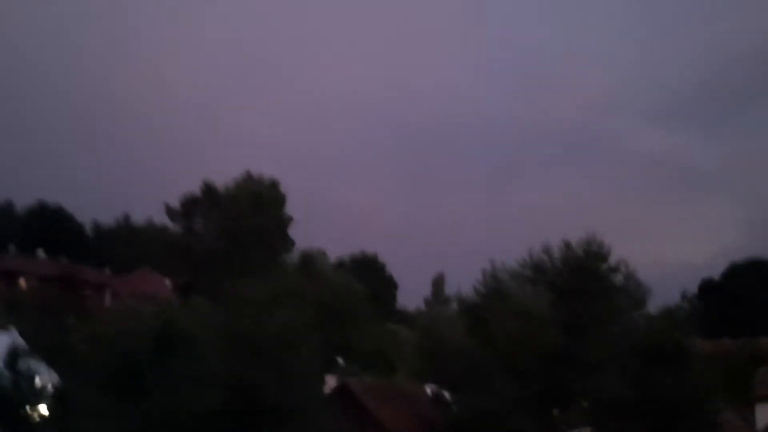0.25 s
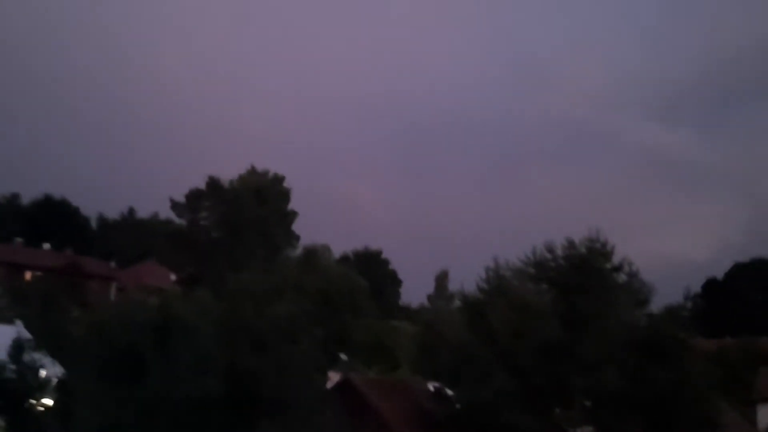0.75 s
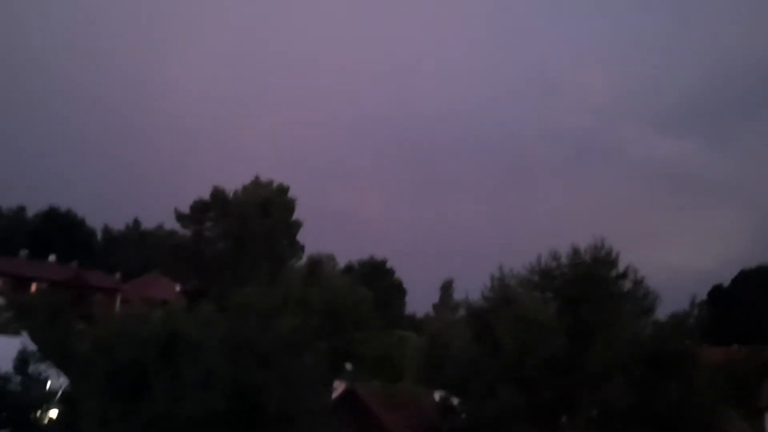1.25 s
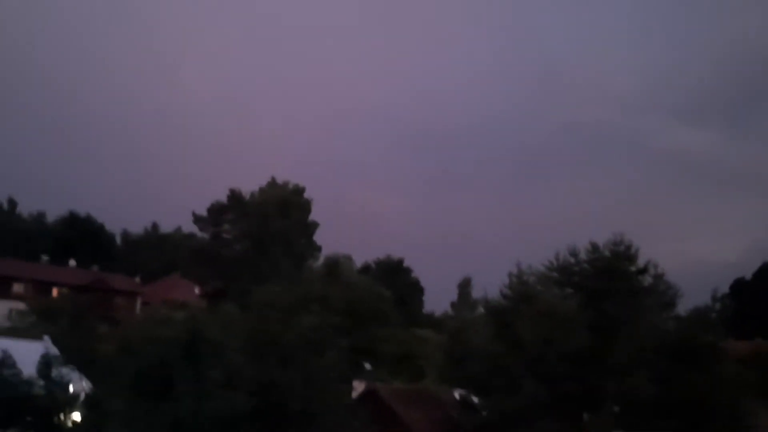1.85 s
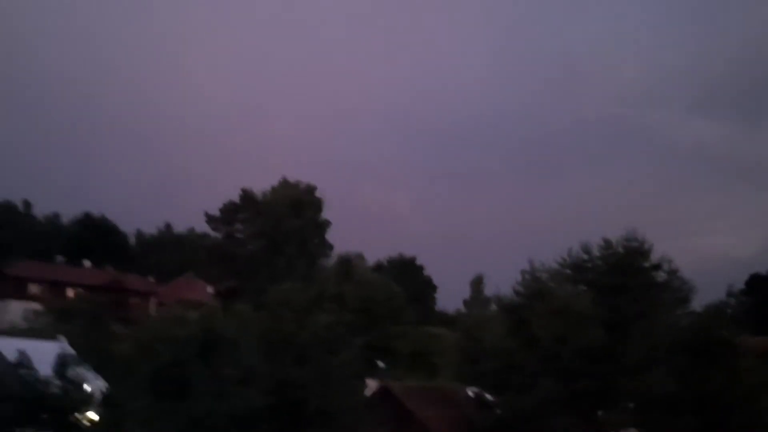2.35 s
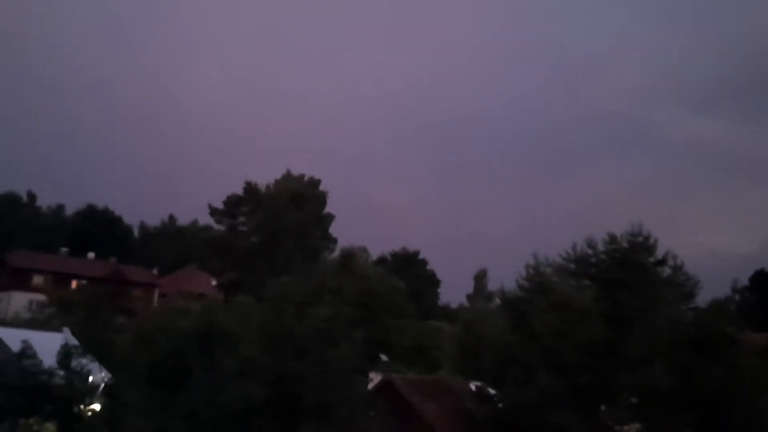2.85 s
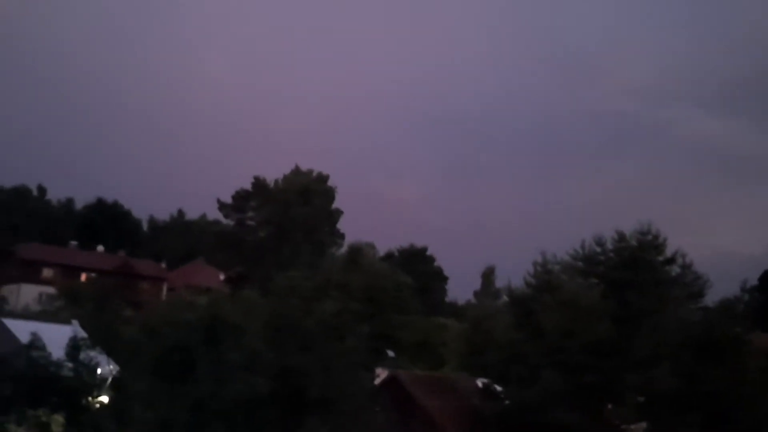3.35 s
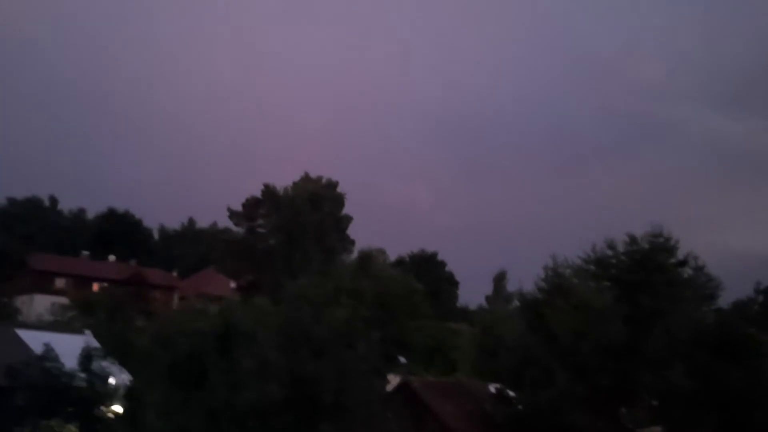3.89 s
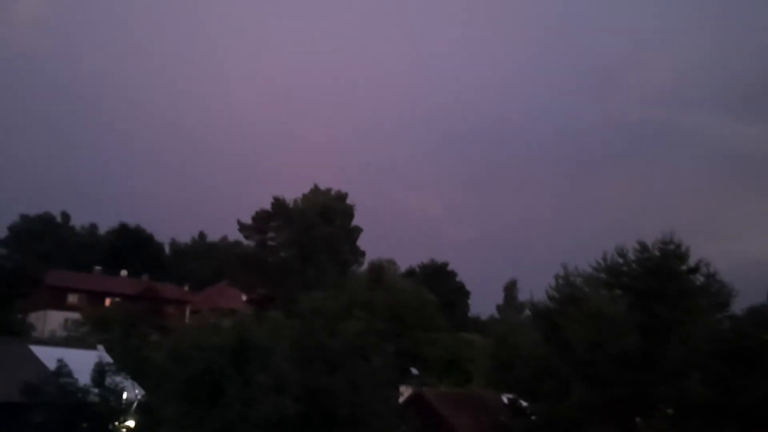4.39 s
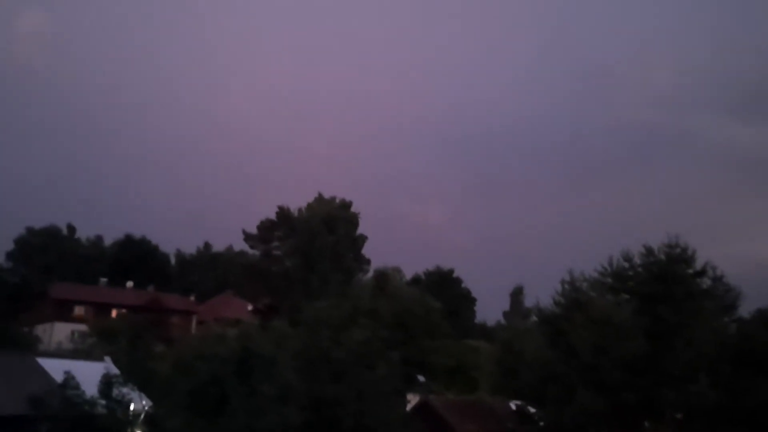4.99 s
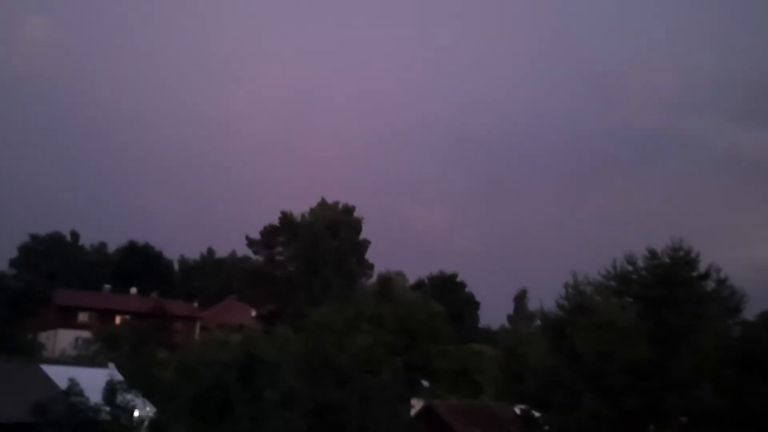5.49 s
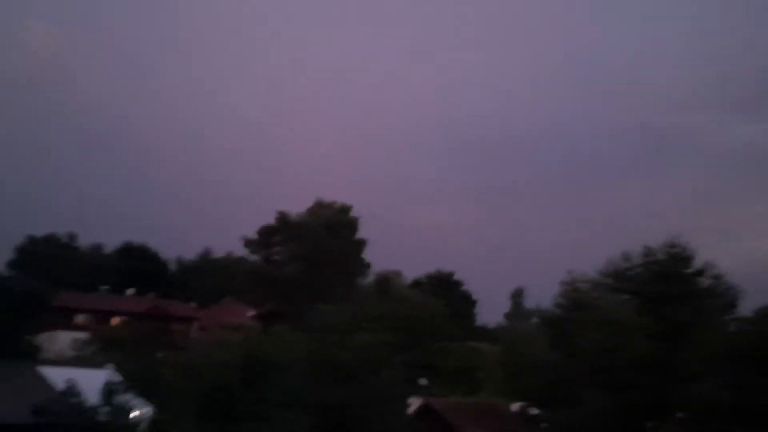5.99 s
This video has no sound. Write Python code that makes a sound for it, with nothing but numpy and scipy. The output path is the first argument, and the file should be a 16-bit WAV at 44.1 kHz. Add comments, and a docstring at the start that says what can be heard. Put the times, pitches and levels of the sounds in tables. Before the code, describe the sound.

Open air over gardens at dusk, with a faint distant road hush leaning left and a very slight bright microphone hiss throughout. From 0 s, deep far thunder rolls unevenly, loudest until about 1.4 s, then sinking to a faint rumble by 3 s. At 0.2 s a thrush on the left gives a short whistle that jumps up and falls, then two fast, rippling trills at 0.5-0.7 and 0.8-1.0 s. Two soft, low, far hoots follow at 0.9 and 1.4 s. From 1.9 to 2.6 s a songbird ahead makes quick upward chirps, then high double-voiced falling slides and small descending notes. A faint reedy thrush phrase comes at 3.5 s. Thunder growls again, more weakly, around 5-5.3 s and briefly near 6 s. Seven sharp thrush chips tick evenly from 5.2 to 5.7 s; high swooping songbird notes finish from 5.8 to 6.2 s. Trees and roofs blur the songs in a short haze.

```python
"""Dusk over gardens before a storm: far thunder rolls from the start and fades, over a distant road's hush.
A thrush on the left whistles and trills (sine tones with weak overtones), then two far hoots sound.
A songbird ahead slides two voices at once; the thrush adds a faint reedy phrase. Near the end thunder
growls again (filtered random strokes) while the thrush chips and the songbird sings once more.
Trees and roofs scatter both birds' song into a short haze; the road is filtered noise."""
import sys
import numpy as np
from scipy import signal
from scipy.fft import rfft, irfft, next_fast_len
from scipy.io import wavfile
from scipy.ndimage import uniform_filter1d, map_coordinates

SR = 44100
rng = np.random.default_rng(int(sys.argv[2]) if len(sys.argv) > 2 else 0)


def output_pcm(signal):
    """Save a mono or channel-first signal as 16-bit PCM at the path in sys.argv[1].

    Samples are clipped to [-1, 1] before scaling.
    """
    pcm = np.clip(np.atleast_2d(signal).T, -1, 1) * 32767
    wavfile.write(sys.argv[1], SR, np.round(pcm).astype(np.int16))


N = 274937
SIZE = next_fast_len(N)  # samples in each Fourier transform
EDGE_S = 0.008  # usual fade of a note, in seconds

# how an open beak passes overtones: [f/Hz of the overtone, level/dB relative to the note, before rasp]
THRUSH_BEAK = [(4500, -42.5), (6300, -31), (7300, -43.5), (8200, -57)]
SONGBIRD_BEAK = [(4000, -27), (6500, -10), (7600, -17.5), (8500, -44), (11000, -31), (12500, -36),
                 (14000, -40)]


def thunder():
    """Three layers (roll, growl, crackle), each from its own countless random strokes of slightly uneven strength."""
    # course of the thunder: [t/s, roll level/dB, growl level/dB, crackle level/dB], before a random waver
    strength = [(0.03, -24.5, -37.5, -60), (0.6, -27, -38.5, -59), (0.79, -30.5, -43.5, -58.5),
                (0.86, -31, -50, -64.5), (0.93, -24, -37.5, -61), (0.99, -31, -43.5, -60.5),
                (1.08, -25.5, -38, -60), (1.32, -27, -40, -65), (1.41, -31, -45.5, -62),
                (2.07, -41.5, -54, -64.5), (2.22, -38, -51.5, -63), (2.93, -46.5, -60, -65),
                (3.4, -44.5, -54, -61), (3.5, -43, -60, -71), (3.6, -53, -59, -63),
                (3.73, -42.5, -51, -57.5), (4.14, -50, -58, -64.5), (4.19, -41.5, -51.5, -56.5),
                (4.64, -49, -56.5, -65), (4.93, -47.5, -52.5, -60.5), (5.0, -41.5, -38, -52),
                (5.05, -40.5, -45.5, -57), (5.19, -43, -34, -50.5), (5.31, -43.5, -46.5, -58),
                (5.52, -49, -53.5, -64.5), (5.9, -50, -47, -62.5), (5.99, -42, -43.5, -61.5),
                (6.23, -54, -62.5, -62)]
    # left-right likeness of [roll, growl, crackle], 1 = the same on both sides
    likeness = (.99, .93, .7)
    # tone of each layer: [f/Hz, relative level/dB per Hz]
    roll = [(12, -88), (22, -41), (35, -18), (55, 2), (72, 6.5), (120, 7), (155, 2), (190, -6),
            (240, -50.5), (400, -130)]
    growl = [(80, -120), (150, -52), (185, -1.5), (230, -2), (310, 0), (370, -11.5), (430, -26.5),
             (520, -58.5), (800, -130)]
    crackle = [(200, -100), (350, -33.5), (450, -1), (550, 0.5), (640, -6), (760, 0), (950, -15),
               (1400, -27), (2600, -110)]
    strokes_per_s, stroke_spread_db, waver_db = 1500, 1.43, 1.7
    t = np.arange(N) / SR
    s, *levels_db = np.transpose(strength)
    out = 0
    for tone, db, alike in zip((roll, growl, crackle), levels_db, likeness):
        struck = rng.random(N) < strokes_per_s / SR
        uneven = undb(stroke_spread_db * rng.exponential(size=N))
        strokes = rng.standard_normal((2, N)) * struck * uneven
        mid, side = (level(colour(v, tone), 0) for v in strokes)
        # level out slow random swells, so that the table sets the slow course
        steady = np.sqrt(uniform_filter1d(mid ** 2, int(.25 * SR)) + 0.025)
        alike = np.clip(alike, 0, 1)
        shared = np.sqrt((1 + alike) / 2) * mid / steady
        opposed = np.sqrt((1 - alike) / 2) * side * np.array([[1], [-1]])
        out = out + (shared + opposed) * undb(np.interp(t, s, db) + waver_db * walk(9))
    return out


def thrush():
    """The left bird: near-sine whistles, trills and chips, and a faint reedy phrase, in a haze."""
    # whistles, one list a note: [t/s, f/Hz, level/dB before waver and final gain]; the last is the reedy phrase
    whistles = [
        [(.183, 2400, -59.5), (.21, 2850, -54), (.222, 3700, -45), (.229, 3330, -46.5), (.25, 3450, -41.5),
         (.258, 2950, -49), (.3, 2720, -50), (.362, 2480, -51), (.376, 2330, -69)],
        [(.186, 3050, -71.5), (.205, 3350, -59.5), (.218, 3600, -61.5)],
        [(3.5, 2500, -86), (3.535, 2830, -76), (3.6, 2870, -73), (3.625, 3060, -82), (3.68, 3070, -84),
         (3.71, 3250, -99)],
    ]
    # trills: [start t/s, crest t/s, end t/s, base f/Hz at start, at crest, at end, level/dB at the crest,
    # t/s of one flick, gap to the next/ms, gap growth each flick/ms, upper voice's first base f/Hz,
    # its level/dB]; levels before flick dips, edges, waver and final gain
    trills = [(.478, .536, .678, 2080, 3000, 2550, -38.5, .5105, 12.4, .58, 2750, -50.5),
              (.8, .858, .998, 2250, 2980, 2650, -38.5, .8239, 13.26, .28, 3000, -49)]
    # chips: [t/s at the top, top f/Hz, level/dB, second voice's middle f/Hz, its level/dB];
    # levels before fades, waver and final gain
    chips = [(5.184, 3200, -62, 4700, -75), (5.2783, 3230, -61.5, 6120, -73), (5.361, 3380, -57, 4480, -71),
             (5.447, 3470, -52, 4000, -64), (5.5475, 3480, -53.5, 4020, -69),
             (5.636, 3670, -51, 4600, -78.5), (5.7276, 3620, -54, 4500, -73)]
    notes = [track(rows) for rows in whistles[:-1]]
    for row in trills:
        notes.extend(trill(*row))
    for row in chips:
        notes.extend(chip(*row))
    clear = whistle(notes, THRUSH_BEAK, third_db=-13.0, waver_db=1.4, steady=.15)
    reedy = whistle([track(whistles[-1])], SONGBIRD_BEAK, third_db=-20.5, waver_db=2.2, steady=0.37)
    placed = place(reedy + clear, pan_db=9.5, lag_s=0, haze_db=-8.5, haze_pan_db=10,
                   near_t60=0.15, far_t60=1.15, far_db=-6, sway_s=.00013)
    return placed * undb(-4)


def track(rows):
    """Join a note's table points by straight lines: time, pitch and level at every sample."""
    s, *columns = np.transpose(rows)
    t = span(s[0], s[-1])
    return [t] + [np.interp(t, s, c) for c in columns]


def trill(s, crest_s, end_s, from_hz, crest_hz, end_hz, db, flick_s, gap_ms, slowing_ms,
          upper_from_hz, upper_db):
    """Pitch creeps up to a sharp flick and drops, turn by turn; a second voice flicks out of step until the crest."""
    flick_sharp, flick_lean = 3.2, .12  # no units: narrower peaks, steeper drop
    flick_hz, flick_grow_s, flick_dip_db = 662, .025, -5.5  # each flick is softer at its peak
    droop_hz, droop_s = 280, .015  # the base sinks at the very end
    swell_db, sag_db = -11.5, -6.5  # start and end, relative to the crest
    upper_lead_s, upper_to_hz, upper_flick_hz = 0.012, 3580, 383
    n = np.arange(-8, 17.)  # flick numbers
    peak_s = flick_s + (gap_ms * n + slowing_ms * n ** 2 / 2) / 1000

    def flick(t, shift):
        """Height of the flick, 0 to 1, its turns moved by a share of one turn."""
        turn = np.pi * (np.interp(t, peak_s, n) + shift)
        leaning = turn + flick_lean * (1 - np.cos(2 * turn))
        return np.abs(np.cos(leaning)) ** flick_sharp

    t, knots = span(s, end_s), [s, crest_s, end_s]
    grown = np.clip(np.minimum(t - s, end_s - t) / flick_grow_s, 0, 1)
    base_hz = np.interp(t, knots, [from_hz, crest_hz, end_hz]) - droop_hz * np.exp((t - end_s) / droop_s)
    hz = base_hz + flick_hz * grown * flick(t, 0)
    breath_db = db + np.interp(t, knots, [swell_db, 0, sag_db]) + edges(t, EDGE_S, EDGE_S)
    lower = t, hz, breath_db + flick_dip_db * flick(t, 0)

    u = span(s - upper_lead_s, crest_s)
    upper_hz = np.linspace(upper_from_hz, upper_to_hz, len(u)) + upper_flick_hz * flick(u, .5)
    upper = u, upper_hz, upper_db + edges(u, upper_lead_s, upper_lead_s)
    return lower, upper


def chip(s, top_hz, db, second_hz, second_db):
    """One voice leaps up and down in a blink; the other rises very briefly just before the top."""
    half_s, drop, lead_s = .008, .45, .006  # half length, share of pitch lost at the ends, second voice's lead
    u = np.arange(-1, 1, 1 / (half_s * SR))  # -1 at the start, 0 at the top
    fade_db = 20 * np.log10(np.cos(np.pi * u / 2) + 1e-3)
    leap = s + u * half_s, top_hz * (1 - drop * np.abs(u) ** 0.91), db + fade_db
    second = s - lead_s + u * half_s, second_hz * (1 + 0.3 * u), second_db + 12 * fade_db
    return leap, second


def songbird():
    """The bird ahead: slides and arches from both sides of its voice box; noisy splashes join it in the haze."""
    # slides of either voice: [start t/s, length/s, from f/Hz, to f/Hz, haste (early above 0, late below),
    # level/dB before carry, edges, waver and final gain]
    slides = [ (1.862, .048, 1980, 2850, -2.5, -50), (1.985, .032, 2250, 3790, 5.5, -55.5),
              (2.035, 0.022, 3280, 4740, 7, -55), (2.074, 0.03, 3970, 5330, 7, -53),
              (2.114, 0.084, 7060, 3430, 0.85, -49.5), (2.118, 0.082, 9650, 4620, 2, -51),
              (2.268, .127, 7080, 4010, -.3, -56.5), (2.271, 0.13, 8520, 5550, 0.1, -52),
              (2.456, .034, 8100, 7550, .4, -56), (2.498, .02, 7050, 6700, .4, -51),
              (2.517, .024, 6650, 6150, .4, -51), (2.536, 0.02, 6000, 5470, 1, -55.5),
              (5.845, .051, 8230, 7200, 1.5, -53.5), (5.906, .026, 8900, 6390, 3, -52.5),
              (6.032, 0.0432, 7860, 7180, 1, -54), (6.079, 0.026, 8700, 5800, 1.5, -52.5),
              (6.168, 0.051, 7160, 6870, -1, -56), (6.209, 0.022, 8680, 7400, .3, -53),
              (6.216, .02, 6800, 6100, 1, -54)]
    # held notes that swoop up: [start t/s, top t/s, held f/Hz, top f/Hz, top level/dB, held level/dB],
    # levels before edges, waver and final gain
    arches = [(5.822, 5.905, 4594, 6350, -55.5, -64.5), (6.013, 6.08, 4685, 6320, -51, -67.5)]
    notes = [glide(*row) for row in slides] + [arch(*row) for row in arches]
    song = whistle(notes, SONGBIRD_BEAK, third_db=-11.0, waver_db=2.2, steady=2.7)
    placed = place(song + splashes(), pan_db=0.33, lag_s=.00023, haze_db=-1.6, haze_pan_db=0.27,
                   near_t60=0.052, far_t60=0.49, far_db=-8, sway_s=.00013)
    return placed * undb(-2.5)


def glide(s, length, from_hz, to_hz, haste, db):
    """A slide between two pitches, done early or late by its haste, louder where the voice carries."""
    # how well the voice carries at each pitch: [f/Hz, level change/dB]
    carry = [(2000, -18.5), (2700, 0), (3500, -14), (5000, -4), (6500, 4), (7500, -8.5), (8400, -13),
             (9500, -23)]
    attack_share = 0.21  # of the slide's length
    t = span(s, s + length)
    done = np.expm1(-haste * (t - s) / length) / np.expm1(-haste - 1e-9)
    hz = from_hz + (to_hz - from_hz) * done
    carry_db = np.interp(hz, *np.transpose(carry))
    return t, hz, db + carry_db + edges(t, attack_share * length, EDGE_S)


def arch(s, top_s, held_hz, top_hz, db, held_db):
    """A note scooped into and held swoops ever faster to its top, louder as it climbs, then drops away."""
    swoop_s, drop_s, drop_hz, scoop_hz, scoop_s = .014, .018, 1210, 403, 0.0055
    t = span(s, top_s + drop_s)
    climb = np.exp(-(np.maximum(top_s - t, 0) / swoop_s) ** 1.4)
    scoop = scoop_hz * np.exp((s - t) / scoop_s)
    fall = drop_hz * np.maximum(t - top_s, 0) / drop_s
    hz = held_hz - scoop + (top_hz - held_hz) * climb - fall
    return t, hz, held_db + (db - held_db) * climb + edges(t, 2 * EDGE_S, EDGE_S)


def splashes():
    """Short noisy splashes: a few milliseconds of noise in a resonance."""
    # the first rows go with the songbird's slides (the one near 1400 Hz is a low noisy blip under a slide),
    # those after 5 s with the thrush's chips:
    # [start t/s, centre f/Hz, width/Hz of one resonance pass, level/dB before the final gain]
    splash_rows = [(1.916, 4240, 1300, -77), (2.036, 6900, 1210, -69.5), (2.123, 1410, 300, -52.5),
                   (5.181, 5730, 1500, -73.5), (5.206, 4570, 1510, -76), (5.276, 5770, 1600, -71),
                   (5.301, 3970, 1000, -80), (5.361, 6170, 1200, -76), (5.547, 6240, 1200, -80),
                   (5.638, 6740, 1200, -79), (5.723, 6570, 1200, -73)]
    out, t = np.zeros(N), np.arange(int(0.014 * SR)) / SR
    shape = np.sin(np.pi * t / t[-1]) ** 2 * np.exp(-t / 0.0015)
    for s, hz, width, db in splash_rows:
        burst = ring(rng.standard_normal(len(t)) * shape, hz, width)
        start = int(s * SR)
        out[start:start + len(t)] += level(burst, db)
    return out


def ring(x, hz, width):
    """A broad resonance, passed twice so that the sound falls away steeply on either side."""
    b, a = signal.iirpeak(hz, hz / width, SR)
    return signal.lfilter(b, a, signal.lfilter(b, a, x))


def hoots():
    """Two faint far hoots: soft tones of steady pitch, stronger on the left."""
    # hoots: [start t/s, length/s, f/Hz, level/dB before edges, waver and side gains]
    calls = [(.88, .44, 971, -65), (1.36, .32, 937, -64)]
    notes = []
    for s, length, hz, db in calls:
        t = span(s, s + length)
        notes.append((t, np.full(len(t), float(hz)), db + edges(t, .04, .04)))
    tone = whistle(notes, THRUSH_BEAK, third_db=-21.5, waver_db=2.8, steady=.3)
    return tone * undb([[-1.], [-7.]])  # left, right


def road():
    """A distant hush of filtered noise, mostly from the left; parts of it breathe a little on their own."""
    # tone of the hush: [f/Hz, relative level/dB per Hz]
    tone = [(240, -29.5), (400, -4), (586, -14.5), (665, -5), (795, -7), (974, -3.5), (1120, -10),
            (1480, -7), (1620, -6), (1790, -6.5), (2200, -11), (3130, -31.5), (8340, -46), (10800, -61),
            (18300, -120)]
    # left-right likeness: [f/Hz, likeness from -1 to 1]
    likeness = [(60, 0.93), (120, 0.53), (240, 0.66), (490, 0.2), (970, -0.61), (1960, 0.0039),
                (3930, 0.01), (7890, -0.3)]
    # side it comes from: [f/Hz, left minus right level/dB]
    balance = [(60, 14), (100, 2.5), (180, 1), (310, 2), (520, 6), (900, 2.5), (1550, 5.5), (2670, 13),
               (4590, -1), (7890, -3.5)]
    # slow swell and ebb: [t/s, relative level/dB]
    tide = [(0, -1), (.63, 2), (1.77, 0.5), (3.56, 1), (4.63, -1.5), (5.38, 2.5), (6.23, 0.5)]
    road_db, waver_db = -61, 1.  # level of the two sides' average, depth of the breathing
    a, b = rfft(rng.standard_normal((2, SIZE)))
    alike, pan = np.clip(across(likeness), -1, 1), undb(across(balance) / 2)
    apart = np.sqrt(1 - alike ** 2)
    pair = np.array([a * pan, (alike * a + apart * b) / pan])
    average_gain = np.abs(pan / 2 + alike / pan / 2 + .5j * apart / pan)
    pair *= undb(across(tone)) / average_gain  # the average of both sides takes the tone
    octave = np.log2(np.arange(SIZE // 2 + 1) * SR / SIZE + 1)
    swell = undb(np.interp(np.arange(N) / SR, *np.transpose(tide)))
    out = 0
    for k in range(7, 15):  # overlapping parts, an octave apart
        part = irfft(pair * np.clip(1 - np.abs(octave - k), 0, 1), SIZE)[:, :N]
        out = out + part * swell * undb(waver_db * walk(1.6))
    return out * undb(road_db) / np.std(out.mean(axis=0))


def whistle(notes, beak, third_db, waver_db, steady):
    """Near-sine notes from (times, pitch, dB) tracks, with weak overtones and an unsteady breath."""
    out = np.zeros(N)
    rasp = steady + walk(900)  # the overtones come and go faster than the note
    for t, hz, db in notes:
        i = np.round(t * SR).astype(int)
        phase = 2 * np.pi * np.cumsum(hz) / SR
        second, third = (undb(np.interp(k * hz, *np.transpose(beak))) * np.sin(k * phase) for k in (2, 3))
        overtones = rasp[np.minimum(i, N - 1)] * (second + undb(third_db) * third)
        loudness = np.sqrt(2) * undb(db) * signal.windows.tukey(len(t), .12)
        note = loudness * (np.sin(phase) + overtones)
        inside = i < N
        out[i[inside]] += note[inside]
    return out * undb(waver_db * walk(150))


def place(x, pan_db, lag_s, haze_db, haze_pan_db, near_t60, far_t60, far_db, sway_s):
    """Direct sound on both sides (left later by lag_s), plus scatter from near leaves and far trees and roofs."""
    # colour of the haze, fuller near 3 to 4 kHz and 8 kHz, weaker near 6 and 12 kHz: [f/Hz, level change/dB]
    haze_colour = [(2000, 2), (3000, 3.5), (3700, 3.5), (4200, 1), (4600, 1), (6300, -1), (8000, 5),
                   (9000, 3), (12000, -2.5)]
    t = np.arange(int(1.2 * SR)) / SR
    fall = undb(-60 * t / near_t60) + undb(far_db - 60 * t / far_t60)  # t60: seconds to fall 60 dB
    shape = fall * np.minimum(t / 0.004, 1)
    haze = 0
    for _ in range(2):  # groups of branches sway apart, so held notes blur in the scatter
        scatter = level(rng.standard_normal((2, len(t))) * shape, haze_db) / np.sqrt(2 * len(t))
        moved = map_coordinates(x, [np.arange(N) + sway_s * SR * walk(70)], order=3)
        haze = haze + signal.fftconvolve(moved[None], scatter, axes=1)[:, :N]
    left = np.roll(x, int(round(lag_s * SR))) * undb(pan_db / 2)
    right = x * undb(-pan_db / 2)
    return np.array([left, right]) + colour(haze, haze_colour) * undb([[haze_pan_db / 2], [-haze_pan_db / 2]])


def span(start, end):
    """Sample times of a note, in seconds."""
    return np.arange(int(start * SR), int(end * SR)) / SR


def edges(t, attack_s, release_s):
    """Fade a note in and out: level change in dB, lowest at -22 dB."""
    nearness = 1 - np.minimum((t - t[0]) / attack_s, (t[-1] - t) / release_s)
    return -22 * np.clip(nearness, 0, 1) ** 2


def walk(rate):
    """Random values, rate new ones a second, smoothed twice into a wandering curve; spread near 1."""
    k = int(SR / rate)
    held = np.repeat(rng.standard_normal(N // k + 1), k)
    return 4 / 3 * uniform_filter1d(uniform_filter1d(held, k), k)[:N]


def undb(db):
    """Turn dB into a factor on the wave's height."""
    return 10 ** (np.asarray(db) / 20)


def level(x, db):
    """Scale a sound to an average (root mean square) level in dB."""
    return x * undb(db) / np.sqrt(np.mean(x ** 2))


def across(table):
    """Read a table of (Hz, value) at every spectral bin, straight on a log axis."""
    hz, value = np.transpose(table)
    return np.interp(np.log(np.arange(SIZE // 2 + 1) * SR / SIZE + 1), np.log(hz), value)


def colour(x, table):
    """Make each pitch region louder or softer by a table of (Hz, dB)."""
    return irfft(rfft(x, SIZE) * undb(across(table)), SIZE)[..., :N]


def scene():
    """Add the thunder, both birds, the hoots and the road, left and right."""
    return thunder() + thrush() + songbird() + hoots() + road()


def record(dry):
    """The microphone adds a faint bright hiss; a steep filter then cuts the top."""
    # tone of the hiss: [f/Hz, relative level/dB per Hz]
    hiss_tone = [(3000, -7), (9500, -4), (12000, 0), (16000, 0.5)]
    hiss_db, top_hz = -82.3, 15700  # hiss level before the cut, frequency of the cut
    hiss = level(colour(rng.standard_normal((2, N)), hiss_tone), hiss_db)
    top_cut = signal.ellip(10, .2, 70, top_hz, fs=SR, output="sos")
    return signal.sosfilt(top_cut, dry + hiss)


dry = scene()
out = record(dry)
output_pcm(out)
```